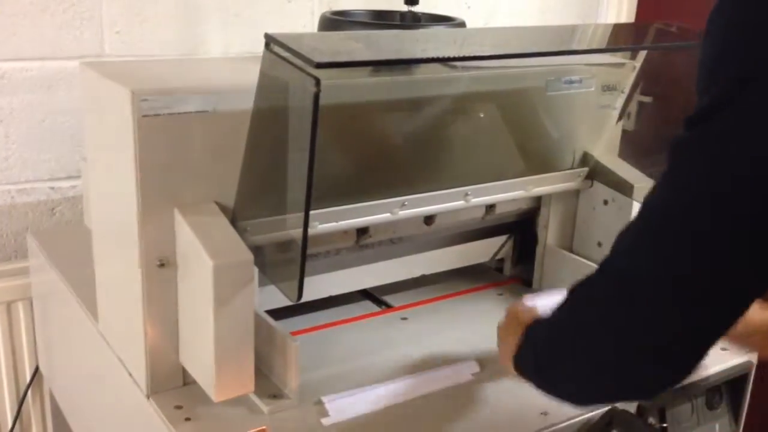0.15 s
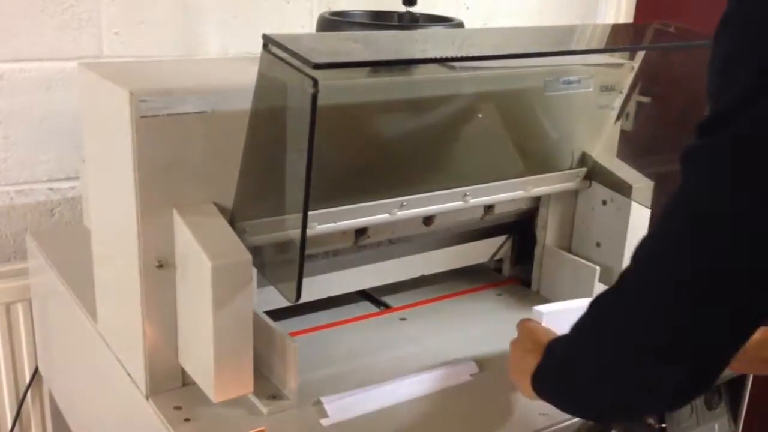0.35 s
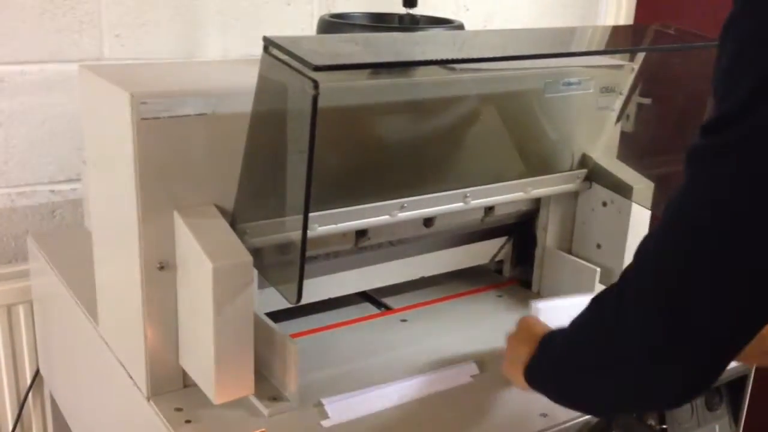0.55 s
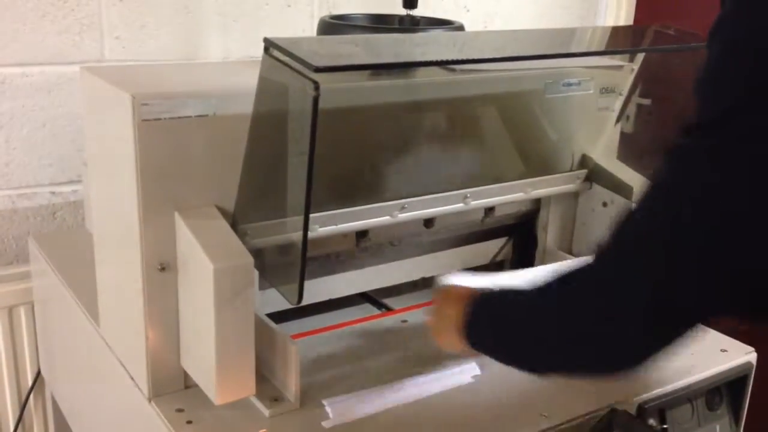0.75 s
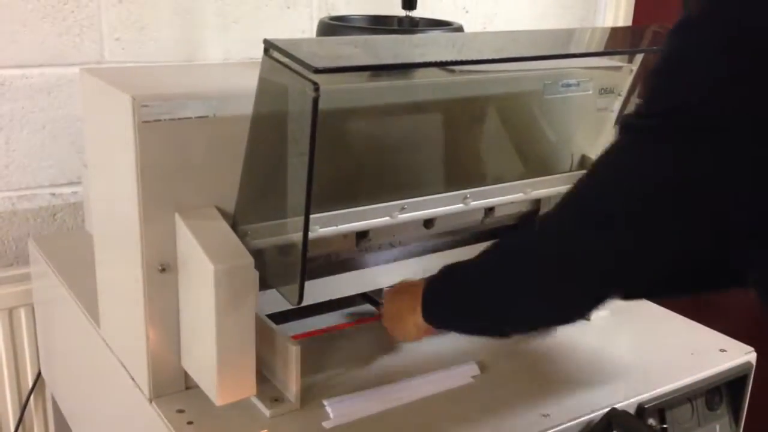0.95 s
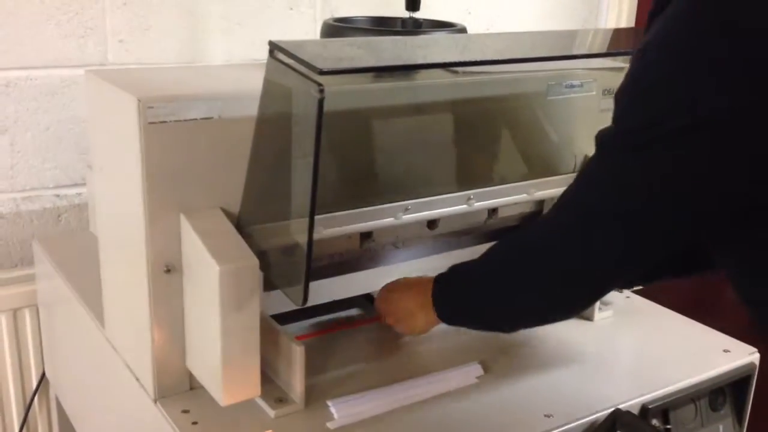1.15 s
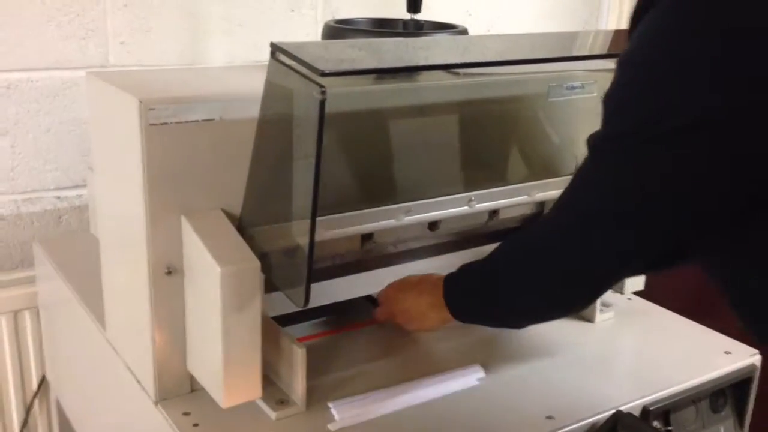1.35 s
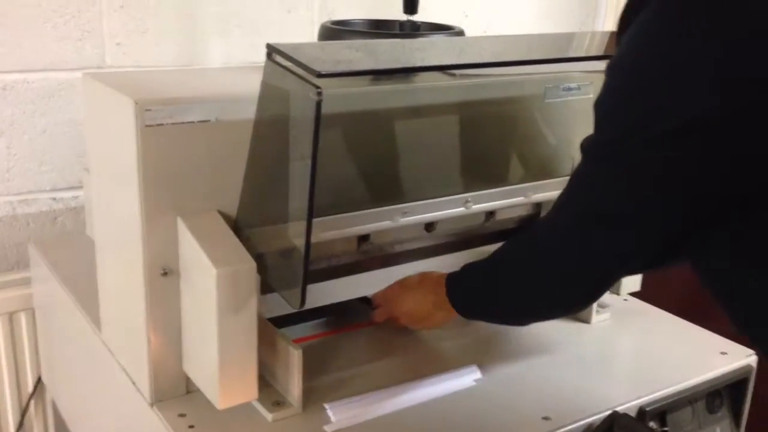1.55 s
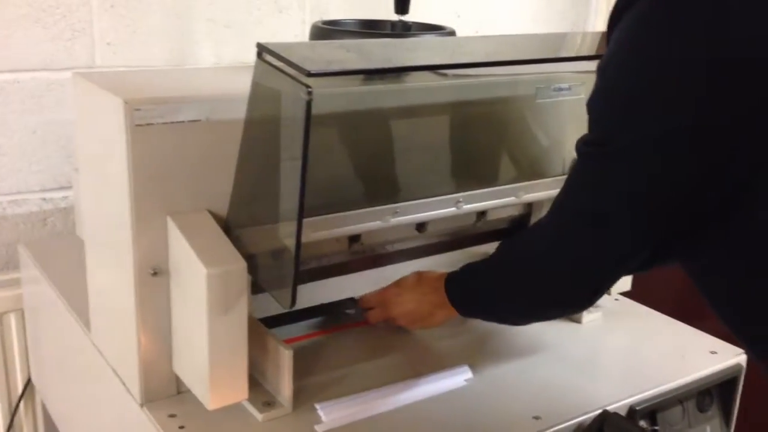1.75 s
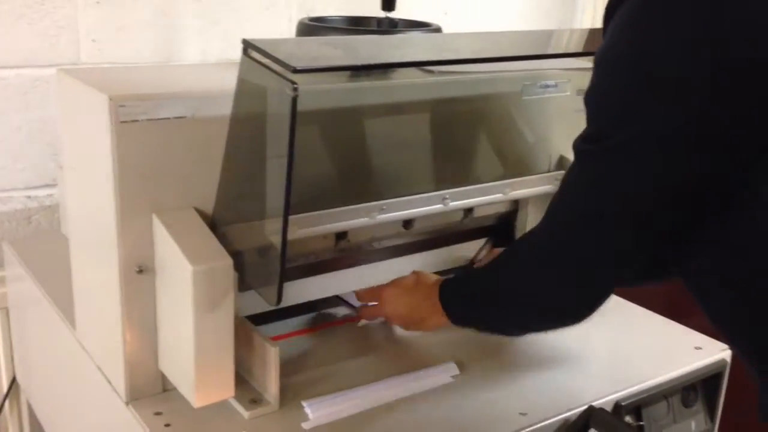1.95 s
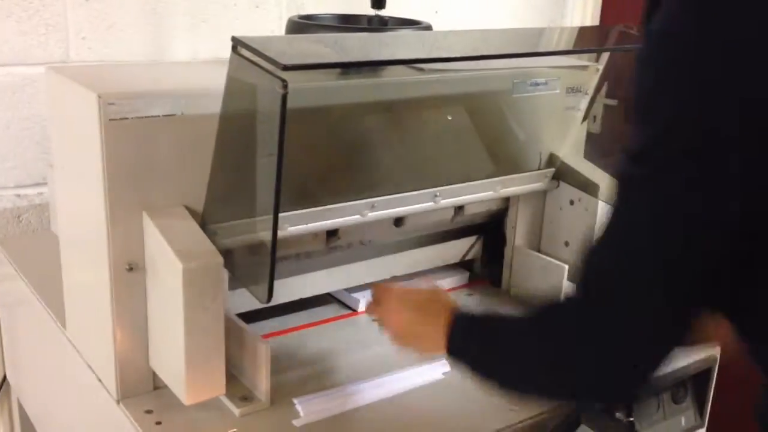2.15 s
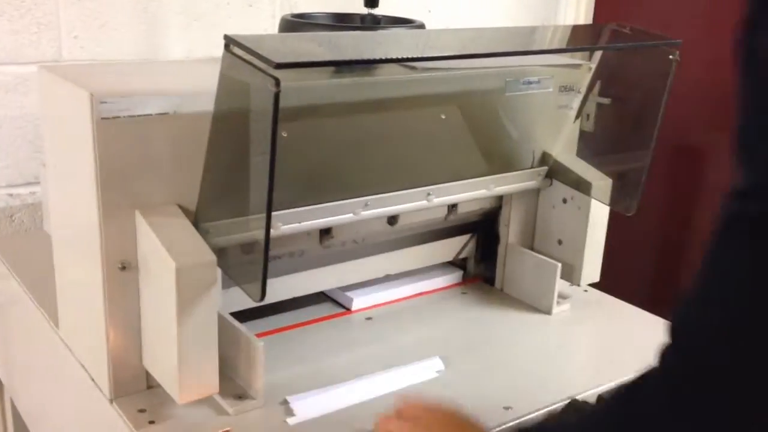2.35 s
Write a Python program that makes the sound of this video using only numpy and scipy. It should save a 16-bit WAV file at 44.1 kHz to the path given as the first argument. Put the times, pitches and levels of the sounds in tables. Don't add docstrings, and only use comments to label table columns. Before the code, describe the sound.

Close up indoors, a sharp clattering knock on a metal machine table rings briefly with a low hollow boom, then soft paper handling, a small skidding click against metal, and last faint rustles over steady hiss.

```python
import sys
import numpy as np
from scipy import signal
from scipy.io import wavfile
from scipy.ndimage import uniform_filter1d

SR = 44100
rng = np.random.default_rng(int(sys.argv[2]) if len(sys.argv) > 2 else 0)


def convert_level_to_amplitude(level_db):
    exponent = np.asarray(level_db, float) / 20
    return 10 ** exponent


def put_to_file(sound):
    columns = np.atleast_2d(sound).T
    safe = np.clip(columns, -1, 1)
    whole_steps = np.round(safe * 32767)
    wavfile.write(sys.argv[1], SR, whole_steps.astype(np.int16))


N = 105840

# (frequency [Hz], level [dB])
HISS_SPECTRUM = [(12, -30), (20, -16), (85, -3.5), (429, -9.5), (862, -16.5), (1310, -16), (2160, -14),
                 (14000, -17.5), (15700, -20.5)]
# (time [s], level [dB], start frequency [Hz], end frequency [Hz], length [s])
SMALL_TICKS = [(0.034, -60.5, 1790, 1120, 0.0027), (.035, -56.5, 4100, 4000, 0.0017),
               (.101, -60.5, 2710, 1668, 0.01), (0.614, -78.5, 3117, 2615, 0.0022),
               (1.803, -74, 2063, 2007, 0.011), (1.944, -49.5, 3388, 899, 0.00073),
               (1.0858, -57.5, 11040, 9020, .0003), (1.091, -59, 5500, 4000, .0008),
               (1.0983, -54, 6470, 4520, 0.00072), (1.943, -67, 2068, 2100, .008),
               (2.353, -63.5, 2710, 2380, 0.012), (2.374, -60.5, 2150, 1650, 0.037),
               (1.89, -73, 836, 910, 0.044), (1.904, -71, 1190, 1480, 0.029)]
# (time [s], level [dB], frequency [Hz], length [s])
SOFT_PUSHES = [(0.005, -64, 154.4, 0.049), (.06, -66, 152, .03), (.095, -69, 169, 0.034),
               (.04, -65.5, 460, 0.011), (.59, -37.5, 151, 0.067), (1.033, -59.5, 403.2, 0.023),
               (1.062, -64.5, 380, 0.0095), (1.1, -67.5, 430, 0.046), (1.24, -67, 150.5, 0.092),
               (1.92, -68.5, 475.4, 0.043), (2.04, -68, 329, 0.057), (2.12, -72, 398.6, 0.041)]
# (middle time [s], half length [s], level [dB], tilt [dB/octave])
PAPER_RUSTLES = [(0.197, 0.047, -71.5, 4), (0.631, 0.025, -63, 4.5), (0.724, 0.046, -70.5, 3.5),
                 (0.883, 0.048, -72, -0.5), (1.069, 0.028, -63.5, 5), (1.095, 0.014, -65.5, 4.5),
                 (1.129, 0.047, -69.5, 1.5), (1.251, 0.055, -71, 2.5), (1.473, 0.021, -70.5, 2),
                 (1.919, 0.028, -72, -3.5), (2.097, .06, -70, 0), (2.364, .015, -69.5, -1.5),
                 (2.4, 0.037, -56, 3)]
# (frequency [Hz], level [dB])
PAPER_COLOUR = [(180, -37), (300, -5), (953, -8), (1200, -5.5), (1780, -9), (4070, -10.5), (7500, -21.5),
                (15500, -33.5)]
# (time [s], crack level [dB], crack length [s], push into the table [dB])
EDGE_CONTACTS = [
    (.2160, -49, 0.0066, -31),
    (.2205, -40, 0.0067, -19),
    (.2225, -36.5, 0.0052, -30),
    (.2270, -29, 0.0047, -19),
    (.2316, -10.5, 0.0022, -13),
    (.2334, -11, .0012, -7.5),
    (.2372, -11, 0.0026, -9.5),
    (.2410, -6.5, 0.0015, 0),
    (.2435, -9.5, 0.0037, -6.5),
    (.2500, -21.5, 0.00298, -13),
]
# (frequency [Hz], level [dB])
CRACK_COLOUR = [(180, -28.5), (300, -4), (849, -12), (2140, -1.5), (2610, -10), (3180, -2.5), (6360, -12),
                (7500, -15), (15500, -35)]
# (frequency [Hz], level [dB], t60 [s])
TABLE_MODES = [(232.7, -31, 0.51), (218, -35.5, 0.88), (240.5, -38, 0.75), (289.5, -33.5, .45),
               (304, -40, .65), (383.8, -29.5, .5), (366.6, -37, .75), (385.5, -42.5, .85),
               (423.4, -23, .09), (443, -38, 0.42), (491.7, -37.5, 0.42), (536.7, -33.5, 0.15),
               (260, -37, .3), (343, -40, 0.22)]
# (frequency [Hz], level [dB], t60 [s])
PANEL_MODES = [(996.3, -4, .12), (1178, -7.5, 0.29), (1328, -6.5, 0.45), (1445, -7, 0.087), (1702, -6, .12),
               (1955, -4, 0.079), (2064, 1, 0.13), (2200, -1.5, .1), (2330, -6, .09), (2500, -8, .1),
               (3147, -10, 0.083), (3870, -5.5, 0.1), (4256, -6, 0.05)]
# (time [s], frequency [Hz], level [dB], t60 [s])
TABLE_BLOWS = [(.2332, 2017, -12.5, .02), (.2332, 3948, -14, .014), (.2332, 6724, -16, .012),
               (.2332, 4860, -18.5, .012), (0.2331, 8960, -23, .008), (0.2332, 12020, -30, .006),
               (.2411, 8500, -30.5, .01), (.2410, 3306, -11.5, .016), (.2410, 4198, -14, .014),
               (.2410, 2185, -18, .06), (.2425, 1422, -17, .05), (.2435, 5310, -21.5, .03)]
# (frequency [Hz], level [dB])
WASH_COLOUR = [(150, -31), (300, -5.5), (2100, -10), (2650, -13.5), (3200, -10.5), (6800, -22),
               (7600, -27.5), (15500, -44.5)]
# (frequency [Hz], level [dB], t60 [s])
CABINET_MODES = [(153.1, -42.2, 1.3), (140.0, -37.2, 1.24), (164.2, -36.9, 1.16), (162.8, -31.1, 0.83),
                 (48, -37, .12), (92, -52, .8), (151.0, -44.5, 2.5), (173.1, -54.2, 2.15),
                 (147.5, -51.4, 2.5)]
# (frequency [Hz], level [dB], t60 [s])
HOOD_MODES = [(3060, -43, .35), (3150, -41, .45), (3215, -43, .4), (3260, -40, .35), (3330, -42, .4),
              (3400, -44, .3)]
# (frequency [Hz], t60 [s])
ROOM_DECAY = [(250, 0.67), (660, 0.52), (1740, 0.48), (4590, 0.37), (8000, 0.31), (12100, 0.24)]
# (frequency [Hz], level [dB])
ROOM_SPECTRUM = [(150, -24), (400, -1), (1000, -3), (14000, -1.5)]
# (time [s], length [s], level [dB], start frequency [Hz], end frequency [Hz])
HOOD_SCRAPES = [
    (1.055, .022, -69, 4100, 4300),
    (1.06, .012, -70, 3200, 3200),
    (1.072, .028, -67, 3300, 3300),
    (1.085, .009, -66, 4100, 5100),
]
# (frequency [Hz], level [dB], start time [s], length [s])
GAUGE_PARTS = [
    (1250, -49, 1.515, .008),
    (3400, -54, 1.515, .005),
    (2400, -54, 1.519, .006),
    (1540, -46, 1.520, .03),
    (3300, -54, 1.522, .01),
    (845, -47, 1.525, .036),
    (1042, -48, 1.525, .027),
    (640, -55, 1.532, .018),
    (3250, -61, 1.546, .018),
]
# (frequency [Hz], level [dB])
SKID_COLOUR = [(180, -42.5), (400, -11.5), (830, -9), (1400, -10), (2400, -4), (3300, -6), (4100, -7),
               (6000, -48)]


def evened(x):
    return x / np.sqrt(np.mean(x ** 2) + 1e-30)


def read(points, hz):
    f, value = np.transpose(points)
    return np.interp(np.log(hz + 1), np.log(f + 1), value)


def add(mix, s, sound):
    part = mix[round(s * SR):][:len(sound)]
    part += sound[:len(part)]


def progress(length):
    return np.arange(0, 1, 1 / (length * SR))


def glide(u, from_hz, to_hz):
    return np.sin(2 * np.pi * np.cumsum(from_hz + (to_hz - from_hz) * u) / SR)


def coloured(x, points, tilt_db=0.):
    hz = np.abs(np.fft.fftfreq(4096, 1 / SR))
    tilt = tilt_db * np.log2((hz + 100) / 3000)
    log_gain = np.log(convert_level_to_amplitude(read(points, hz) + tilt))
    taps = np.fft.ifft(np.exp(np.conj(signal.hilbert(log_gain)))).real[:2048]
    return signal.oaconvolve(x, taps / np.linalg.norm(taps))[:len(x)]


def ringing(modes, length):
    t = np.arange(round(length * SR)) / SR
    return sum(convert_level_to_amplitude(db - 60 * t / t60) * np.sin(2 * np.pi * hz * t) for hz, db, t60 in modes)


def room(x):
    rise_s = .0084
    hz, t, z = signal.stft(rng.standard_normal(SR), SR, nperseg=256)
    decay = convert_level_to_amplitude(-60 * t / read(ROOM_DECAY, hz)[:, None])
    tail = signal.istft(z * decay, SR, nperseg=256)[1]
    rise = np.minimum(np.arange(len(tail)) / SR / rise_s, 1)
    tail = coloured(tail * rise, ROOM_SPECTRUM)
    tail = tail / np.linalg.norm(tail) + ringing(HOOD_MODES, len(tail) / SR) / 10
    return signal.fftconvolve(x, tail)[:N]


def hiss():
    level_db, swell_db, swell_top_hz = -66.5, 3, 700
    hz = np.fft.rfftfreq(1024, 1 / SR)
    real, imaginary, patches = rng.standard_normal((N // 256 + 5, 513, 3)).T
    patches = uniform_filter1d(patches, size=4, axis=0)
    patches = evened(uniform_filter1d(patches, size=10, axis=1))
    swell = swell_db * patches / (1 + (hz[:, None] / swell_top_hz) ** 2)
    z = (real + 1j * imaginary) * convert_level_to_amplitude(read(HISS_SPECTRUM, hz)[:, None] + swell)
    return convert_level_to_amplitude(level_db) * evened(signal.istft(z, nperseg=1024, noverlap=768)[1][:N])


def ticks_and_pushes():
    out = np.zeros(N)
    steady = [(s, db, hz, hz, length) for s, db, hz, length in SOFT_PUSHES]
    for s, db, from_hz, to_hz, length in SMALL_TICKS + steady:
        u = progress(length)
        add(out, s, convert_level_to_amplitude(db) * np.sin(np.pi * u ** 0.56) * glide(u, from_hz, to_hz))
    return out


def rustle():
    grains_per_s, spread_db = 5000, 3.5
    out, t = np.zeros(N), np.arange(N) / SR
    strength = convert_level_to_amplitude(spread_db * np.minimum(rng.exponential(1, N), 3.5))
    struck = rng.random(N) < grains_per_s / SR
    grains = strength * struck * rng.choice([-1., 1.], N)
    grains = evened(evened(grains) + rng.standard_normal(N))
    for s, half, db, tilt_db in PAPER_RUSTLES:
        swell = convert_level_to_amplitude(db) * np.exp(-((t - s) / half) ** 2)
        out += coloured(swell * grains, PAPER_COLOUR, tilt_db)
    return out


def handling():
    out = ticks_and_pushes() + rustle()
    return out + convert_level_to_amplitude(-9) * room(out)


def edge_cracks():
    cracks = np.zeros(N)
    noise = rng.standard_normal((len(EDGE_CONTACTS), 600))
    for (s, crack_db, length, _), grit in zip(EDGE_CONTACTS, noise):
        t = np.arange(len(grit)) / SR
        rise = np.minimum(t / length * 5, 1)
        add(cracks, s, rise * convert_level_to_amplitude(1 + crack_db - 8.7 * t / length) * grit / 2)
    return coloured(cracks, CRACK_COLOUR)


def steel_ring():
    table_db, panels_db, sharp_push_db = -0.5, -28, -16
    pushes = np.zeros(N)
    for s, _, _, push_db in EDGE_CONTACTS:
        add(pushes, s, convert_level_to_amplitude(np.array([push_db])))
    sharp = pushes * (pushes > convert_level_to_amplitude(sharp_push_db))
    table = signal.fftconvolve(pushes, convert_level_to_amplitude(table_db) * ringing(TABLE_MODES, 1.5))[:N]
    panels = signal.fftconvolve(sharp, convert_level_to_amplitude(panels_db) * ringing(PANEL_MODES, .6))[:N]
    return table + panels


def table_blows():
    out, t = np.zeros(N), np.arange(4410) / SR
    for s, hz, db, t60 in TABLE_BLOWS:
        add(out, s, np.minimum(t / .0003, 1) * ringing([(hz, db, t60)], .1))
    return out


def room_wash():
    blow = np.zeros(N)
    add(blow, .2336, convert_level_to_amplitude(np.array([7])))
    return coloured(room(blow), WASH_COLOUR)


def cabinet_boom():
    thump_s, thump_hz, thump_db, thump_length_s = .2367, 152, -14, .05
    boom_s, rise_s, damped_s, damping_db_per_s = .2413, .014, .9, 45
    out, t = np.zeros(N), np.arange(2 * SR) / SR
    pulse = np.sin(np.pi * np.minimum(t / thump_length_s, 1) ** .7) ** 2
    add(out, thump_s, convert_level_to_amplitude(thump_db) * pulse * np.sin(2 * np.pi * thump_hz * t))
    damping = convert_level_to_amplitude(-damping_db_per_s * np.maximum(t + boom_s - damped_s, 0))
    add(out, boom_s, np.minimum(t / rise_s, 1) * ringing(CABINET_MODES, 2) * damping)
    return out


def knock():
    top = edge_cracks() + steel_ring() + room_wash()
    high_pass = signal.butter(4, 140, "high", fs=SR, output="sos")
    return signal.sosfilt(high_pass, top) + table_blows() + cabinet_boom()


def scrapes():
    out = np.zeros(N)
    noise = rng.standard_normal((len(HOOD_SCRAPES), 2000))
    for (s, length, db, from_hz, to_hz), grit in zip(HOOD_SCRAPES, noise):
        u = progress(length)
        flutter = 1 + 0.7 * evened(uniform_filter1d(grit, size=70))[:len(u)]
        add(out, s, convert_level_to_amplitude(db) * np.sin(np.pi * u) * flutter * glide(u, from_hz, to_hz))
    return out


def gauge_skid():
    start_s, hold_s, stop_s, rise_s = 1.514, .024, .022, .009
    level_db, dulling_db, late_tilt_db = -51, -14, -6
    skid, t = np.zeros(N), np.arange(4410) / SR
    stop = convert_level_to_amplitude(-20 * np.maximum(t - hold_s, 0) / stop_s)
    grit = evened(rng.standard_normal(len(t))) * np.minimum(t / rise_s, 1) * stop
    late = np.minimum(t / hold_s, 1)
    dark = coloured(grit * late, SKID_COLOUR, late_tilt_db)
    bright = coloured(grit * convert_level_to_amplitude(dulling_db * late), SKID_COLOUR, 2.77)
    add(skid, start_s, convert_level_to_amplitude(level_db) * (dark + bright))
    return skid


def gauge_ring():
    struck_s = 1.5166
    ring = np.zeros(N)
    for hz, db, s, length in GAUGE_PARTS:
        u = progress(length)
        swell = np.sin(np.pi * u ** 0.6) ** .6
        add(ring, s, convert_level_to_amplitude(db) * swell * np.sin(2 * np.pi * hz * (u * length + s - struck_s)))
    return ring


def gauge():
    skid, ring = gauge_skid(), gauge_ring()
    hood = signal.fftconvolve(skid, convert_level_to_amplitude(-12) * ringing(HOOD_MODES, .5))[:N]
    return ring + skid + hood + room(convert_level_to_amplitude(-22) * ring + convert_level_to_amplitude(-5) * skid)


def scene():
    return (hiss() + handling() + knock() + scrapes() + gauge())[None]


def top_cut(x):
    return signal.sosfilt(signal.butter(12, 15810, fs=SR, output="sos"), x)


def record(dry):
    bass_cut = signal.butter(2, 70, "high", fs=SR, output="sos")
    band_limit = signal.firwin(511, 15330, window=("kaiser", 9), fs=SR)
    mix = signal.sosfilt(bass_cut, dry)
    mix = signal.oaconvolve(mix, band_limit[None], "same")
    return top_cut(mix)


dry = scene()
out = record(dry)
put_to_file(out)
```